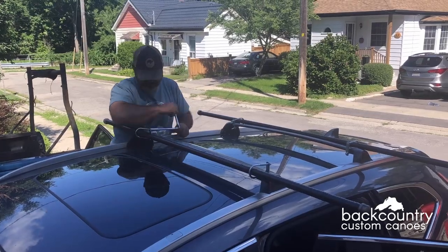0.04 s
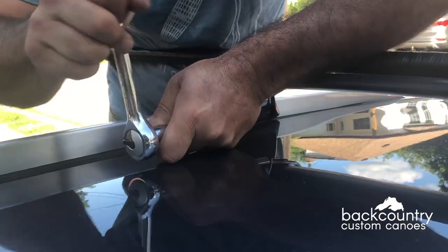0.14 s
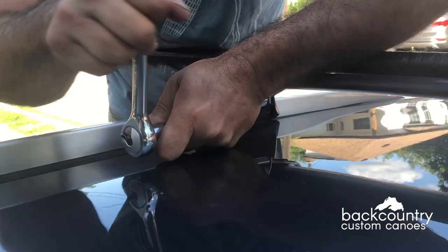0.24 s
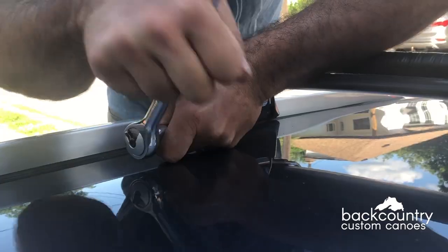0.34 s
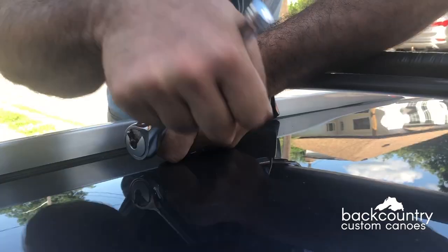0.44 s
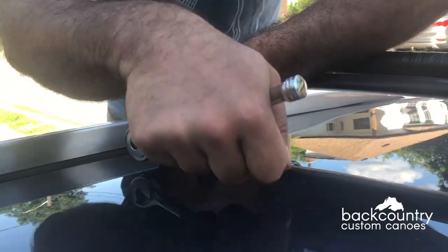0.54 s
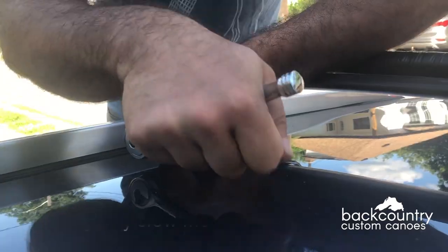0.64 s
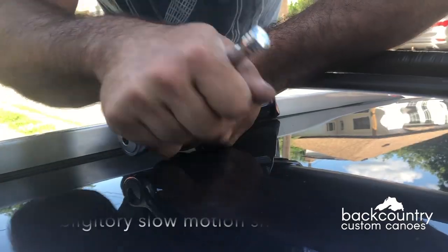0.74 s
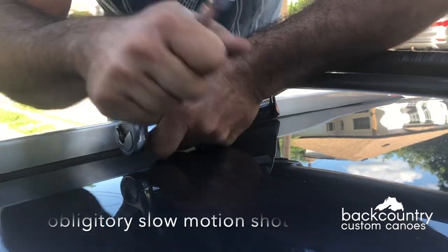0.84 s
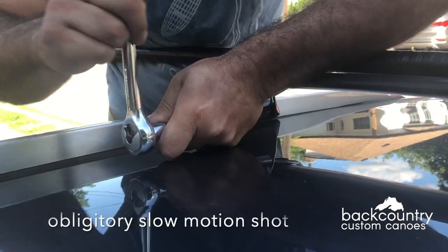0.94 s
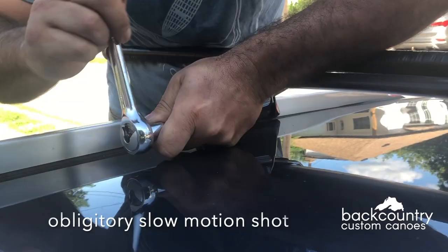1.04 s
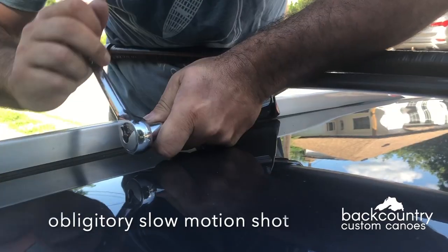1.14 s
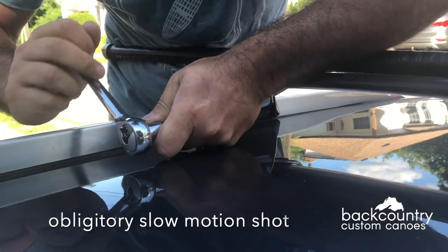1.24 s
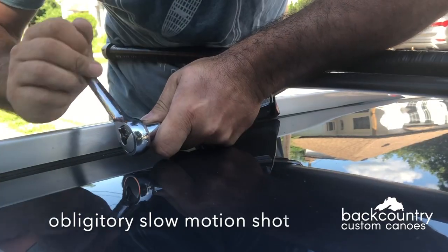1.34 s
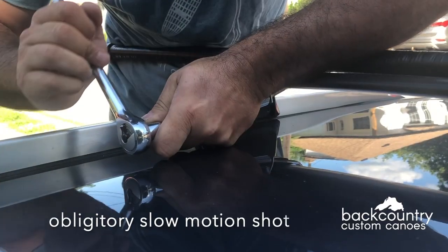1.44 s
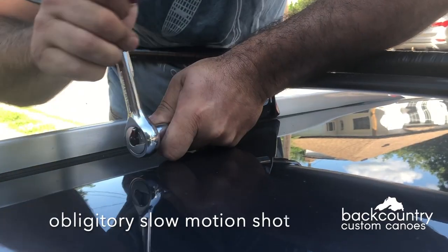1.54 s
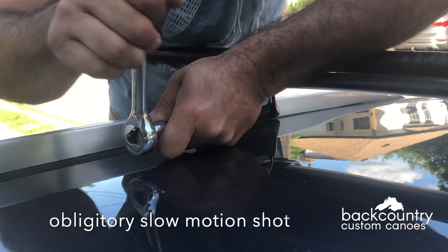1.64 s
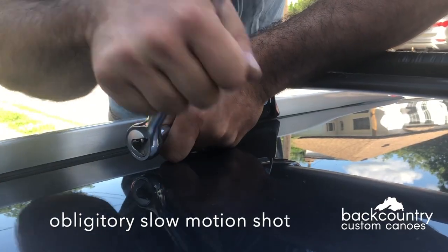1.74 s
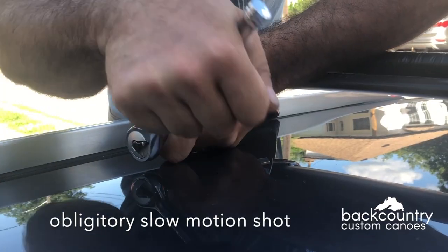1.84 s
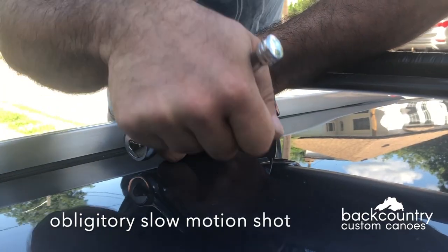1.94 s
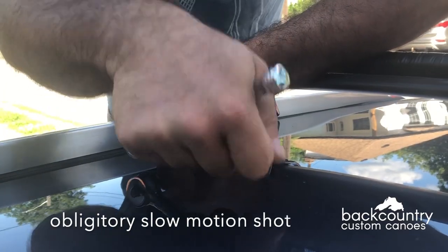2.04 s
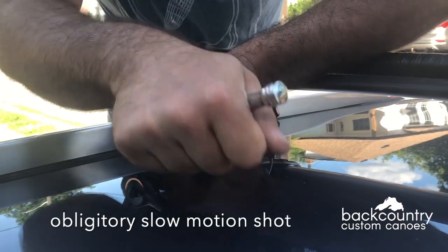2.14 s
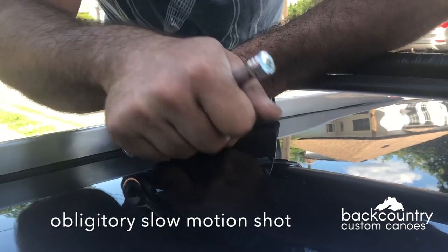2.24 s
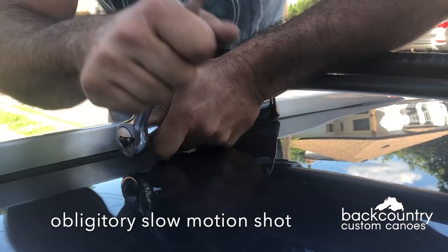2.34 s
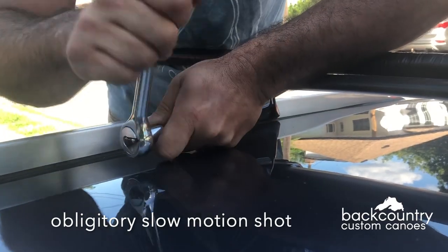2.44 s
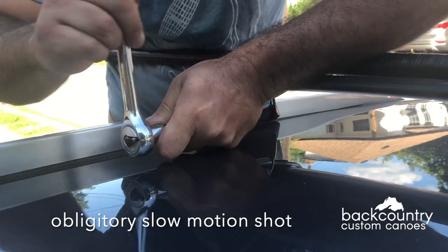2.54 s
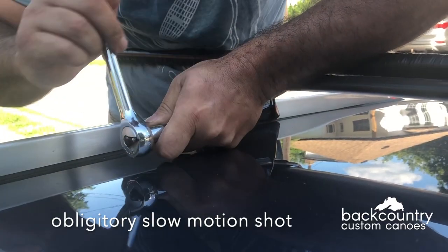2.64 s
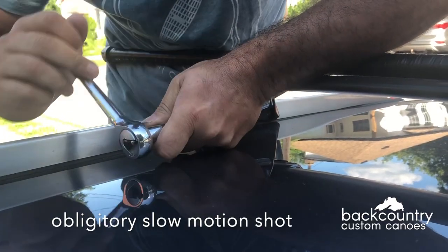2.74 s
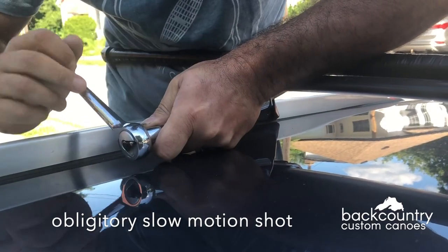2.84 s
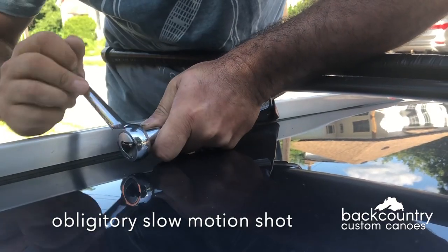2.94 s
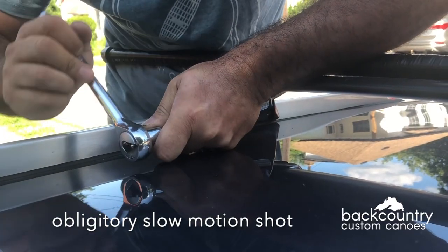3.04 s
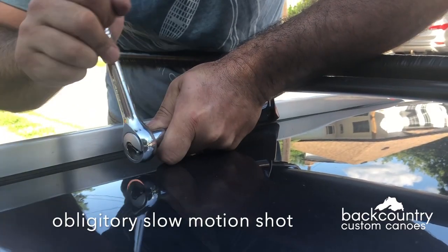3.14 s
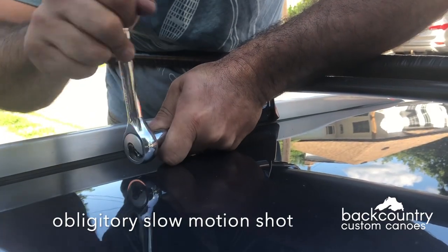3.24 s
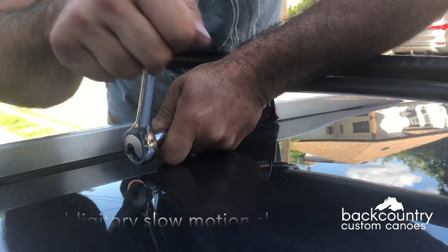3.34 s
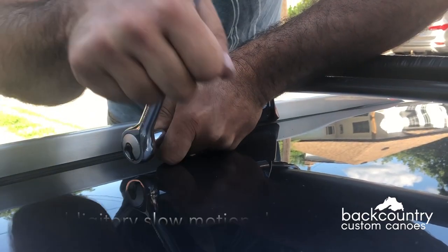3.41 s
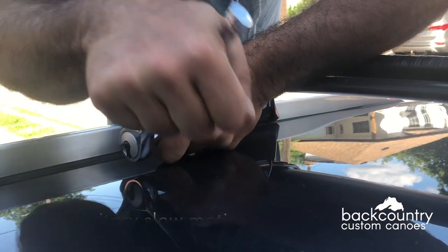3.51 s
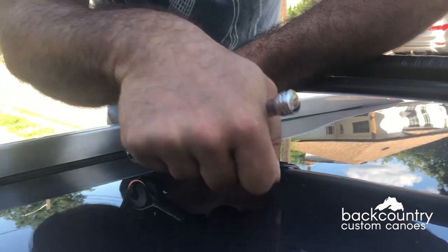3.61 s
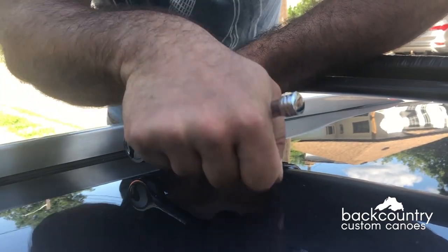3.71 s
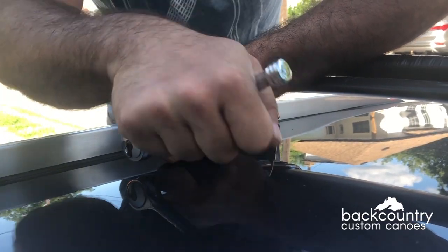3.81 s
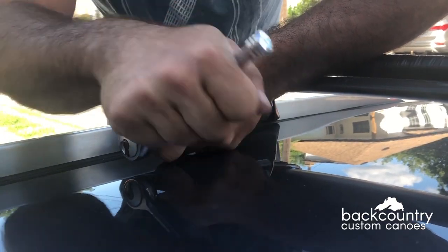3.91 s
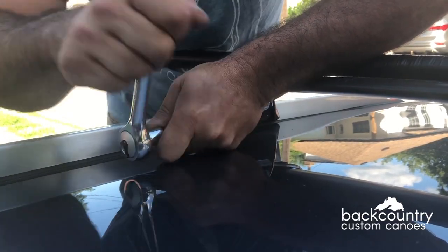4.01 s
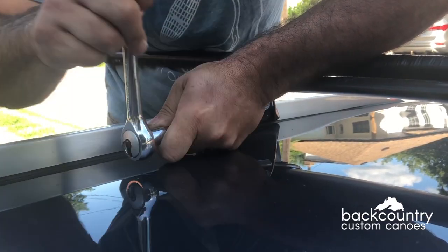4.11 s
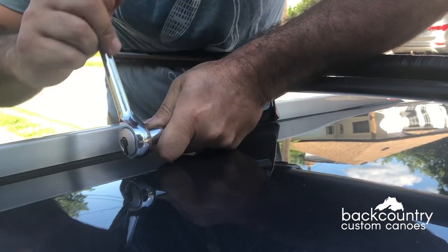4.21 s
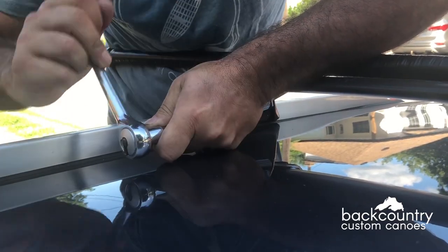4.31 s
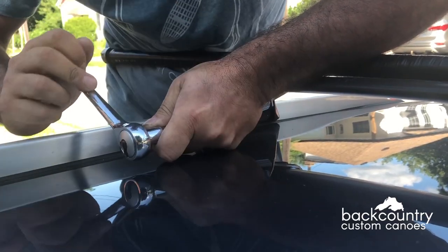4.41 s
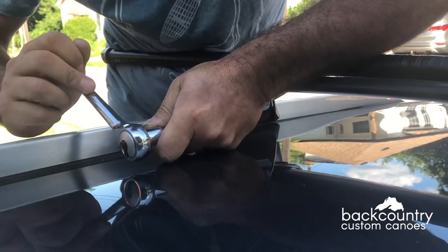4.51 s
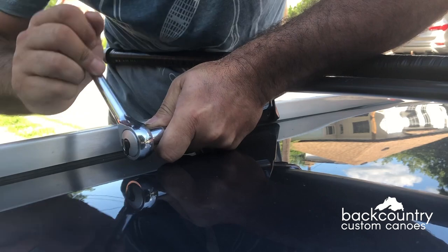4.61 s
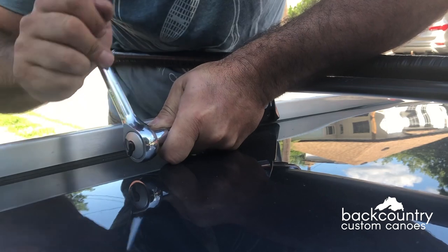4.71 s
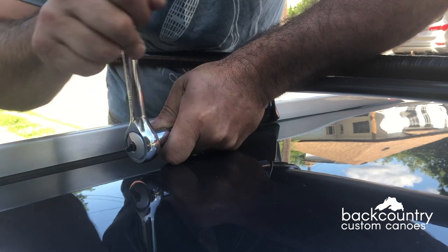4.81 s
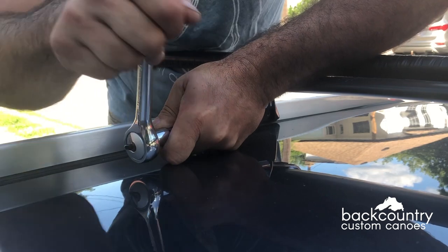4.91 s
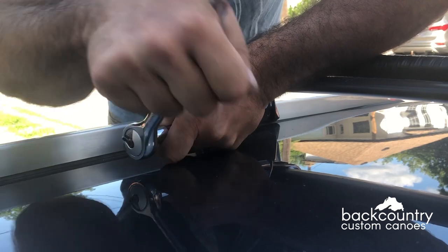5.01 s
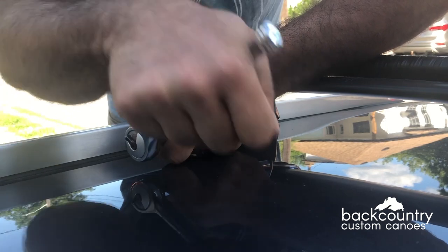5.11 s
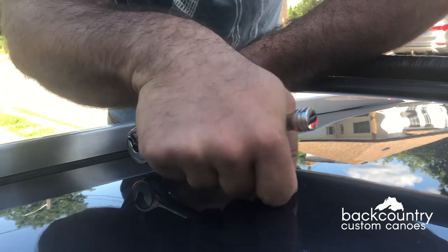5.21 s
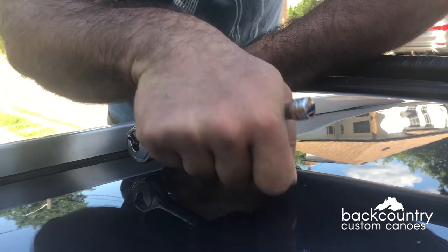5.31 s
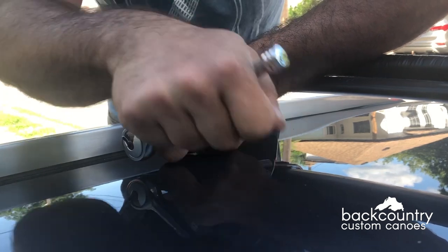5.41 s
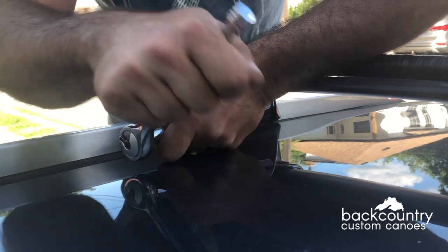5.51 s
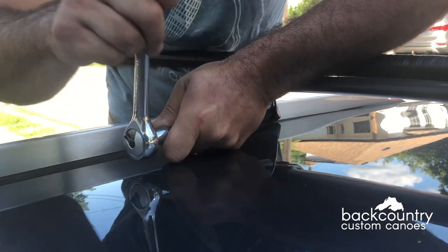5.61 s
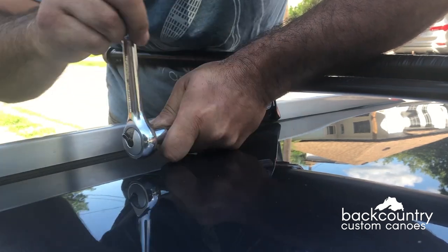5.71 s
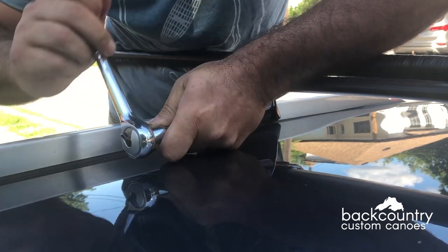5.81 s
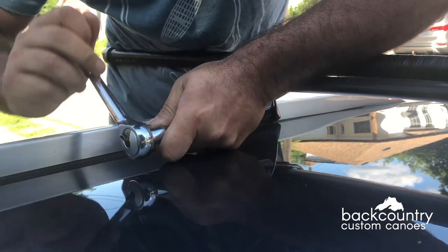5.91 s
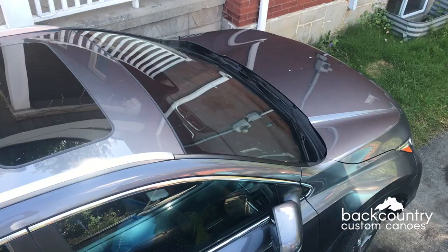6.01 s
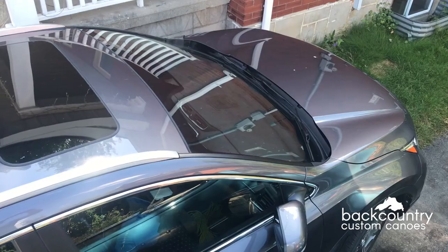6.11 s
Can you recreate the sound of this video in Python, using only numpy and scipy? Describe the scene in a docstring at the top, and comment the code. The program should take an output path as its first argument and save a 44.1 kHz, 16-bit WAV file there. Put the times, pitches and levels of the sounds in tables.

```python
"""Outdoors on a quiet street, a ratchet wrench works a nut on the roof rail of a car, heard slowed down.
On each return stroke the pawl snaps over the gear teeth: bursts of contact noise excite damped steel modes.
The socket knocks on the nut and loose parts rattle, as filtered noise and modes; a hand bumps the roof panel,
whose low modes ring under a noise shudder. A thin rough tone sounds early on; wavering coloured noise
forms the rumble, far traffic and hiss. The top of the spectrum is cut sharply."""
import sys
import numpy as np
from scipy import signal
from scipy.fft import rfft, irfft
from scipy.io import wavfile
from scipy.ndimage import uniform_filter1d

SR = 44100
rng = np.random.default_rng(int(sys.argv[2]) if len(sys.argv) > 2 else 0)


def wav_out(sig):
    """Save sig, one row per channel (or a flat mono array), as 16-bit PCM at SR to the path in sys.argv[1]."""
    wavfile.write(sys.argv[1], SR, np.round(np.clip(np.atleast_2d(sig).T, -1, 1) * 32767).astype(np.int16))


N = 271215
LENGTH = 6144  # samples in the response to one blow

# background levels over time: [t/s, rumble level/dB, traffic level/dB, hiss level/dB]
AIR_LEVELS = [(.15, -47, -59.5, -68.5), (.32, -50, -55.5, -67.5), (.65, -57.5, -68.5, -75.5),
              (1.0, -54.5, -60, -71.5), (1.5, -53, -66.5, -76), (1.679, -55.5, -61.5, -66.5),
              (1.998, -61, -73, -79), (2.3, -56, -65, -65.5), (2.65, -51, -62.5, -60.5),
              (3.099, -56.5, -68.5, -78), (3.4, -59, -66, -71.5), (3.9, -54.5, -61.5, -68.5),
              (4.3, -57, -51, -68.5), (4.65, -56.5, -66.5, -76), (4.999, -55, -63, -70),
              (5.24, -59.5, -62.5, -73), (5.32, -59, -77.5, -72), (5.8, -51.5, -56.5, -75.5),
              (6.08, -52, -65.5, -65.5)]
# relative spectral densities of the background: [f/Hz, level/dB per Hz]
RUMBLE_SPECTRUM = [(12, -31.5), (20, 2), (43, 1), (97, -8), (269, -10), (382, -26.5), (443, -13),
                   (500, -19), (650, -55.5), (1100, -120)]
TRAFFIC_SPECTRUM = [(180, -30.5), (300, -0.5), (380, -13), (545, -18), (616, -0.5), (839, -3), (978, -11),
                    (1780, -6), (2300, -5.5), (3030, -24), (3500, -30.5), (4550, -53), (7700, -120)]
HISS_SPECTRUM = [(1180, -37.5), (2000, -2), (2170, -8.5), (3010, -11.5), (3440, -7.5), (5740, -16),
                 (8850, -12.5), (9200, -13.5), (12000, -51), (20200, -120)]
TRAFFIC_WAVER_DB, OTHER_WAVER_DB = 2.0, 1.5  # standard deviation of the level waver

WHISTLE_S, WHISTLE_SAG_S, WHISTLE_END_S = 0.17, .36, 0.437  # onset, start of the sag, end
WHISTLE_HZ, WHISTLE_SAG_HZ_PER_S, WHISTLE_DB = 9050, 5100, -68

# hand on the roof panel: [t/s, level/dB]
BUMPS = [(.304, -41), (3.061, -44), (3.51, -49.5), (5.266, -27)]
# modes of the roof panel: [f/Hz, relative level/dB, t60/s]
PANEL_MODES = [(37.5, -1.5, 1), (65, -4.5, 0.93), (91, -4, 0.18), (137.4, 0.5, 0.2), (188, -2, 0.087),
               (271.7, -6.5, 0.18), (486, -10, 0.039)]
# shudder of the sheet in octave bands: [lower edge f/Hz, relative level/dB, t60/s]
SHUDDER_BANDS = [(30, -16.5, 0.47), (58.6, -9, 0.55), (118, -14, 0.14), (233, -50, 0.054)]

# modes of socket, rail and roof under a blow: [f/Hz, relative level/dB, t60/s before damping]
RAIL_MODES = [(430, -8, .05), (640, 0, .06), (720, -2, .04), (850, -4, .03), (1010, -1, .05),
              (1270, -1, .04), (1545, 1, .04)]
# modes of the wrench steel in six groups near 1.9, 3.45, 5, 5.5, 7.5 and 7.8 kHz:
# [f/Hz, relative level/dB, free t60/s]
STEEL_MODES = [
    [(1875, 0, .2), (1960, -12, .05)],
    [(3452, 0, .17), (3560, -8, .04), (3190, -8, .05)],
    [(4980, 0, .055), (4880, -4, .04), (5090, -4, .05)],
    [(5535, 0, .1), (5310, -5, .05), (5440, -8, .05)],
    [(7478, 0, .085), (7580, -5, .06)],
    [(7725, 0, .08), (7860, -5, .04), (8020, -7, .06)],
]
# highest steel mode: [f/Hz, relative level/dB, free t60/s]
TOP_MODE = [(9170, 0, .08)]

# play in the mechanism while the handle swings back: [start t/s, loosest t/s, end t/s, top level/dB]
RATTLE_STROKES = [(0.829, 0.982, 1.68, -44.5), (2.33, 2.561, 3.43, -50), (3.961, 4.127, 4.7, -43),
                  (5.48, 5.726, 6.07, -46)]
RATTLE_IN_DB, RATTLE_OUT_DB = -22, -30  # at start and end of a stroke, against the top

# loose knocks of the socket on the nut: [t/s, reference level/dB, brightness/dB]
KNOCKS = [(0.304, -30, -25), (0.813, -35, -0.5), (0.85, -46.5, 4.5), (0.875, -35, -4),
          (0.975, -24.5, -12.5), (1.321, -32, -18.5), (1.377, -42.5, -23), (1.398, -40, -23),
          (1.426, -37.5, 0), (1.46, -37, -12), (2.091, -48.5, -14.0), (2.194, -51.0, -9), (2.209, -64, 11),
          (2.23, -54, -0.5), (2.28, -60, 8), (2.332, -34.5, -4.5), (2.366, -40.5, -1), (2.403, -53.5, 9.5),
          (2.782, -26.5, 1), (2.841, -34.5, -5), (3.02, -43.5, -5), (3.055, -31.5, -8), (3.084, -40.5, 0),
          (3.134, -39, 0.5), (3.166, -57.5, 9.5), (3.334, -52.5, 5), (3.582, -43, -11),
          (3.817, -46.5, -3.5), (3.904, -45.5, 0.5), (3.98, -44, -8.5), (4.344, -31.0, 3.5),
          (4.394, -28, -4.5), (4.45, -44.5, 6.5), (4.473, -47.5, 6), (4.53, -31.5, -6.5),
          (4.586, -36.5, -28.5), (4.634, -35.5, -8), (4.794, -37.5, -6), (5.073, -44.5, -8.5),
          (5.397, -44, -9), (5.458, -50.5, 7.0), (5.489, -43, -15.5), (5.52, -33.5, -1),
          (5.692, -33.5, -15), (5.754, -22.5, -2.5), (5.836, -34, 4.5), (5.918, -33.5, 0.5)]
MID_DB, HIGH_DB = -6, -21.5  # tick at 1-4 kHz and above, against the reference level
HIGH_PER_BRIGHT = 2.9  # dB of the high tick per dB of brightness
THUMP_DB, THUMP_FOLLOWS = -52, 0.7  # level at a mean knock; share of the level swing followed

# pawl snaps: [t/s, strength level/dB, 7.5-7.8 kHz pair over 5-5.5 kHz pair/dB,
#   upper over lower ring of the 5 kHz pair/dB, the same for the 7.5 kHz pair/dB,
#   3.45 kHz ring against the strength/dB, 1.9 kHz ring against its usual level/dB,
#   jolt passed to socket and rail/dB, ring time as a share of the free t60]
SNAPS = [(0.8967, -24.5, 0.5, -4.5, -0.5, -20.5, 6, -0.5, 0.31),
         (0.9239, -30.5, 3, 3, 0.5, 0.5, -3, -4, 0.45), (0.9483, -19, -11.5, -19.5, -4.5, -15, 9, 3, 0.59),
         (0.97, -23.5, 1.5, -7.5, -0.5, -9.5, 3, 8, 0.48),
         (0.9891, -21, -1.5, -10, -0.5, -18.5, 12, 2, 0.33),
         (1.0176, -26, -0.5, -11.5, 18, -10, 5.5, -5.5, 0.6),
         (1.054, -29.0, -3, -1.5, 12.5, -24, 5, 7.5, 0.77), (1.0979, -26, -1.5, -2, 0, -19.5, -4, -3, 0.63),
         (1.1396, -21, -5.5, -10, 2.5, -15, -3, -5, 0.36), (1.1736, -26.5, 8.5, 8, 28, -1, 9, -1.5, 0.22),
         (1.2185, -20, 1.5, 10.5, 19, -17.5, 10.5, -7, 0.49),
         (1.267, -25, -2.5, 26.5, -5.5, -12, 10, -9.5, 0.31), (2.414, -23.5, -2, 13, 6.5, -10, 4, 0, 0.38),
         (2.4475, -21, 6, 1.5, 10, -9.5, 8, -4.5, 0.29), (2.4715, -26.5, -6.5, -8, -26, -7, 15.5, 2.5, 0.3),
         (2.5011, -21.5, 0.5, -6, -4, -17.5, 4, 7, 0.37), (2.5458, -20.5, 7, 9.0, 12, -9.5, 3, -5.5, 0.27),
         (2.59, -22, -2, -0.5, -5.5, -21, 13.5, 5.5, 0.3), (2.6304, -17, 11.5, 9, 10, -23, 3, 4, 0.8),
         (2.6702, -24, 0, 0, 10, -15, 10, 1, 0.6), (2.7058, -25.5, 8.0, 6, -2.0, -19, 0, 7, 0.89),
         (2.7512, -23.5, 1, 1, 10.5, -20, -7, 0, 0.91), (2.795, -26.5, -4, 5.5, 10, -12, -5, -4.5, 0.56),
         (2.8652, -26.5, 1.5, 0, -3, -8, -5, -14, 0.15), (4.0348, -21, -6, 37, 1, -19, -8.5, 2.5, 0.37),
         (4.0655, -32.5, -7, 2.5, -0.5, -6, 0, 5.5, 1), (4.088, -20, 8, 3.5, -11.5, -13.5, 3, 8, 1),
         (4.118, -26.5, 0, 2, -15.5, -12, -9, 5.5, 0.19), (4.138, -24, 4.5, 16.5, 33, -6, 3, -10, 0.31),
         (4.173, -23, 6.5, 22, -5, -14, 2, -5, 1), (4.2124, -24.5, -2, 13, -6, -7.5, -2, 3, 0.72),
         (4.2514, -26, 3, 19.5, 2, -9, 1, -8, 0.36), (4.288, -29, 1.5, -4.0, -8, 1, 0, -1, 0.9),
         (4.3239, -24, 2.5, 31, 4.0, -5, -8, -7, 0.5), (4.3647, -29, 3.5, 8, 11, -13.5, -6, 1.5, 0.31),
         (4.4104, -30.5, 2.5, -2, -10, -8, 11, 0, 0.59), (4.4861, -28, -1.5, 5, 2, -28, 1, 3, 0.18),
         (5.5771, -32.5, 10, 0.5, 5.5, -15, -10.5, 3, 0.45), (5.6102, -32, 0, -6.5, -2, -6, -4, 4, 0.27),
         (5.6379, -24, -0.5, -6, 15.5, -15.5, -10, 0.5, 0.34),
         (5.6624, -27, -3, -5, -12, -12.5, 0, 1, 0.64), (5.685, -22.5, -4, -22, 4, -33, 6, 8.5, 0.27),
         (5.7144, -23, 17, 17, 21.5, -17, 8, 7, 0.57), (5.7712, -29, -3.5, 7, 3, -4.5, -2.5, -9, 0.19),
         (5.816, -18, 12.5, 17, 29, -15.5, -21, -0.5, 0.37),
         (5.8526, -26, 8.5, 14, 16, -11.5, -23, -1.5, 0.52), (5.889, -25, 5, 37, 21, -4.5, -13, -13, 0.54),
         (5.929, -23, 0.5, -10.5, -23, -11, -7.5, 3, 0.48),
         (5.9733, -23.0, 2, -10.0, -31, -25, -3.5, -8.5, 0.37),
         (6.0116, -51, 8.0, 2, -2.0, -4, -3, -5, 0.34), (6.0307, -26.5, 5, 12, -26, -42, -3.5, -2, 0.18)]
CHATTER_S, CHATTER_SPREAD = 0.0042, 0.35  # median decay constant of a contact; spread of its logarithm
CRACK_DB = -8  # against the strength
LOW_RING_DB, CLACK_DB, RAIL_DB = -46.5, -39, -44  # usual levels; clack and rail follow the jolt
SCATTER_DB = 5.5  # standard deviation of crack, clack and rail from snap to snap

START_S, END_S, END_DROP_DB = 0.1494, 6.092, -14
CUTOFF_HZ = 9250


def from_db(db):
    """Logarithmic level: the amplitude ratio is ten to the power of dB / 20."""
    return 10 ** (np.asarray(db) / 20)


def share_db(lean_db):
    """Conservation of power: two parts share one power, the upper lean_db above the lower."""
    lower = -10 * np.log10(1 + from_db(lean_db) ** 2)
    return lower, lower + lean_db


def band(x, low_hz, high_hz):
    """Linear filtering: a band-pass along time selects one range of the spectrum."""
    return signal.sosfilt(signal.butter(2, [low_hz, high_hz], "band", fs=SR, output="sos"), x)


def ring(push, hz, t60):
    """Damped oscillator: a two-pole resonator answers a push with one decaying mode."""
    radius = from_db(-60 / (t60 * SR))
    w = 2 * np.pi * hz / SR
    # the tiny offset avoids denormal numbers
    return signal.lfilter([0, np.sin(w)], [1, -2 * radius * np.cos(w), radius * radius], push + 1e-18)


def unit_loudness(rows):
    """Short-time power: each row is scaled to a largest early running rms of 1."""
    power = uniform_filter1d(rows[..., :1024] ** 2, size=256, axis=-1)
    return rows / np.sqrt(power.max(axis=-1, keepdims=True) + 1e-30)


def chatter(count, rise_s, fall_s):
    """Repeated contact: parts rattle for some milliseconds, giving one row of noisy force per blow."""
    t = np.arange(LENGTH) / SR
    noise = rng.standard_normal((count, LENGTH))
    return noise * (1 - np.exp(-t / rise_s)) * np.exp(-t / fall_s)


def body(force, modes, scatter_db, hold, detune):
    """Modal superposition: each blow drives each mode differently; grip and seating detune and damp it."""
    t = np.arange(LENGTH) / SR
    chance = rng.standard_normal((len(force), len(modes), 2))
    response = 0
    for k, (hz, db, t60) in enumerate(modes):
        level_db = db + scatter_db * chance[:, [k], 0] - 60 * t / (t60 * hold)
        mode_hz = hz * (1 + detune * chance[:, [k], 1])
        response = response + from_db(level_db) * np.sin(2 * np.pi * mode_hz * t)
    return unit_loudness(signal.fftconvolve(force, response, axes=1)[:, :LENGTH])


def place(times, rows):
    """Superposition in time: each row is added at its own onset."""
    out = np.zeros(N + LENGTH)
    for s, row in zip(times, rows):
        start = round(s * SR)
        out[start:start + LENGTH] += row
    return out[:N]


def shaped_noise(spectrum, waver_db):
    """Spectral shaping: white noise takes a given colour and a slowly wavering level, at rms 1."""
    hz, db = np.transpose(spectrum)
    log_hz = np.log(np.arange(1, N // 2 + 2) * SR / N)
    colour = np.interp(log_hz, np.log(hz), db, left=-200, right=-200)
    noise = irfft(rfft(rng.standard_normal(N)) * from_db(colour), N)
    knots = np.arange(0, N + 2000, 2000)
    waver = np.interp(np.arange(N), knots, rng.standard_normal(len(knots)))
    noise = noise * from_db(waver_db * waver)
    return noise / noise.std()


def street():
    """Incoherent sum: rumble, far traffic and hiss are independent noises with levels of their own."""
    s, *levels = np.transpose(AIR_LEVELS)
    t = np.arange(N) / SR
    rumble, traffic, hiss = [from_db(np.interp(t, s, db)) for db in levels]
    out = rumble * shaped_noise(RUMBLE_SPECTRUM, OTHER_WAVER_DB)
    out += traffic * shaped_noise(TRAFFIC_SPECTRUM, TRAFFIC_WAVER_DB)
    return out + hiss * shaped_noise(HISS_SPECTRUM, OTHER_WAVER_DB)


def whistle():
    """Amplitude modulation: slow noise roughens a thin tone whose pitch sags towards its end."""
    t = np.arange(N) / SR
    sag_time = np.clip(t - WHISTLE_SAG_S, 0, WHISTLE_END_S - WHISTLE_SAG_S)
    hz = WHISTLE_HZ - WHISTLE_SAG_HZ_PER_S * sag_time
    rough = signal.lfilter([1], [1, -.99], rng.standard_normal(N))
    on = np.clip(np.minimum(t - WHISTLE_S, WHISTLE_END_S - t) / .02, 0, 1)
    tone = np.sin(2 * np.pi * np.cumsum(hz) / SR)
    return from_db(WHISTLE_DB) * on * tone * rough / rough.std()


def surroundings(x):
    """Diffuse reflection: roof and rail send back a short scattered tail, by convolution."""
    t = np.arange(LENGTH) / SR
    tail = rng.standard_normal(LENGTH) * from_db(-60 * t / .08) * (t > .003)
    return signal.fftconvolve(x, band(tail, 300, 7000) / np.sqrt(np.sum(tail ** 2)))[:N]


def bump(s, level_db):
    """Plate vibration: a soft push rings low panel modes; the sheet shudders on, low bands longest."""
    push = np.zeros(N)
    push[round(s * SR)] = 1
    # neighbouring modes start with opposite sign
    modes = sum(from_db(db) * ring(push, hz, t60) * (-1) ** k
                for k, (hz, db, t60) in enumerate(PANEL_MODES))
    after = np.arange(N) / SR - s
    noise = rng.standard_normal(N) * (after > 0)
    shudder = 0
    for low_hz, db, t60 in SHUDDER_BANDS:
        decay = from_db(db - 60 * np.maximum(after, 0) / t60)
        # the root offsets the smaller power of a narrower band
        shudder = shudder + decay * band(noise, low_hz, 2 * low_hz) * np.sqrt(SR / low_hz)
    return from_db(level_db) * (modes + shudder)


def rattle():
    """Random impulse excitation: tiny uneven contacts of loose parts are heard through rail and steel."""
    hits = (rng.random(N) < 500 / SR) * rng.standard_normal(N)  # about 500 contacts per second
    grains = hits * from_db(4.4 * np.minimum(rng.exponential(1, N), 4))
    rail = sum(from_db(db) * ring(grains, hz, t60 * .6) for hz, db, t60 in RAIL_MODES)
    steel = sum(from_db(db) * ring(grains, hz, t60 * 0.35)
                for modes in STEEL_MODES for hz, db, t60 in modes)
    sound = rail + from_db(-11.5) * steel + 3.8 * band(grains, 1500, 6000)
    t = np.arange(N) / SR
    level = 0
    for *times, db in RATTLE_STROKES:
        stroke_db = [db + RATTLE_IN_DB, db, db + RATTLE_OUT_DB]
        level = level + from_db(np.interp(t, times, stroke_db, left=-200, right=-200))
    return level * sound / sound.std()


def socket():
    """Forced vibration: duller knocks make rail and roof answer, with a short tick and a soft thump."""
    s, knock_db, bright_db = np.array(KNOCKS).T[:, :, None]
    force = chatter(count=len(s), rise_s=0.0007, fall_s=0.0046)
    out = from_db(knock_db - 13) * body(force, RAIL_MODES, scatter_db=4, hold=.6, detune=.04)
    # two passes steepen the band edges
    knock = band(band(force, 350, 1600), 350, 1600)
    out += from_db(knock_db - 9.0) * unit_loudness(knock)
    mid_tick = band(band(force, 890, 3000), 1100, 4000)
    out += from_db(knock_db + MID_DB + bright_db) * unit_loudness(mid_tick)
    high_db = knock_db + HIGH_DB + HIGH_PER_BRIGHT * bright_db
    out += from_db(high_db) * unit_loudness(band(force, 4200, 9500))
    soft = chatter(count=len(s), rise_s=0.00086, fall_s=0.031)
    thump_db = THUMP_DB + THUMP_FOLLOWS * (knock_db - knock_db.mean())
    out += from_db(thump_db) * unit_loudness(band(soft, 110, 350))
    return place(s.ravel(), out)


def pawl():
    """Impact excitation: each snap rings the steel, with a broad crack, a clack and the rail's answer."""
    columns = np.array(SNAPS).T[:, :, None]
    s, db, tilt_db, lean5_db, lean7_db, mid_ring_db, low_ring_db, jolt_db, hold = columns
    chance = rng.standard_normal((len(s), 4)).T[:, :, None]
    fall_s = CHATTER_S * np.exp(CHATTER_SPREAD * chance[0])
    force = chatter(count=len(s), rise_s=.0016, fall_s=fall_s)
    hold = np.clip(hold, .15, 2)

    pair5_db, pair7_db = share_db(tilt_db)
    lower5_db, upper5_db = share_db(lean5_db)
    lower7_db, upper7_db = share_db(lean7_db)
    ring_db = [LOW_RING_DB + low_ring_db, db + mid_ring_db,
               db + pair5_db + lower5_db, db + pair5_db + upper5_db,
               db + pair7_db + lower7_db, db + pair7_db + upper7_db]
    out = sum(from_db(level) * body(force, modes, scatter_db=3, hold=hold, detune=.003)
              for level, modes in zip(ring_db, STEEL_MODES))

    crack_db = db + CRACK_DB + SCATTER_DB * chance[1]
    out += from_db(crack_db - 19) * body(force, TOP_MODE, scatter_db=0, hold=hold, detune=0)
    out += from_db(crack_db - 9) * unit_loudness(band(force, 7600, 11000))
    out += from_db(crack_db - 11) * unit_loudness(band(force, 4000, 7400))

    # climbing the next tooth presses the pawl down and damps its ring, at 1600 dB/s
    to_next = np.diff(s, axis=0, append=np.inf)
    out *= from_db(-np.maximum(np.arange(LENGTH) / SR - to_next, 0) * 1600)

    clack_db = CLACK_DB + jolt_db + SCATTER_DB * chance[2]
    out += from_db(clack_db) * unit_loudness(band(force, 1300, 3300))
    # the heavy rail takes up the blow later and shakes longer
    shake = chatter(count=len(s), rise_s=0.0039, fall_s=0.024)
    rail_db = RAIL_DB + jolt_db + SCATTER_DB * chance[3]
    out += from_db(rail_db) * body(shake, RAIL_MODES, scatter_db=5, hold=.7, detune=.03)
    return band(band(place(s.ravel(), out), 400, 16000), 400, 16000)


def scene():
    """Superposition: wrench, its reflections, roof, street and whistle add linearly."""
    wrench = pawl() + socket() + rattle()
    reflections = from_db(-12.5) * surroundings(wrench)
    bumps = sum(bump(*row) for row in BUMPS)
    return (wrench + reflections + bumps + street() + whistle())[None]


def record(dry):
    """Gating and low-pass filtering: a late start, a drop at the end, a sharp cut with a weak skirt above."""
    t = np.arange(N) / SR
    gate = np.clip((t - START_S) / 0.014, 0, 1) * np.where(t < END_S, 1, from_db(END_DROP_DB))
    gated = dry * gate
    below = signal.sosfiltfilt(signal.ellip(8, .1, 25, CUTOFF_HZ, fs=SR, output="sos"), gated)
    skirt = signal.sosfilt(signal.butter(8, CUTOFF_HZ, fs=SR, output="sos"), gated - below)
    return below + from_db(-24) * skirt


dry = scene()
out = record(dry)
wav_out(out)
```